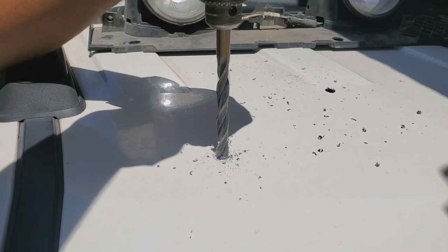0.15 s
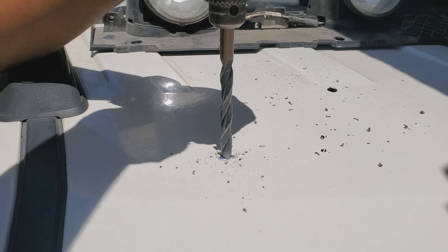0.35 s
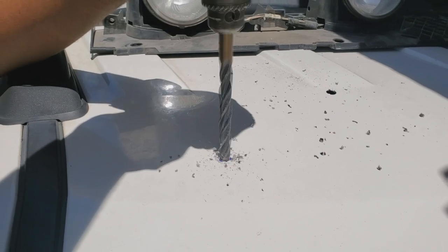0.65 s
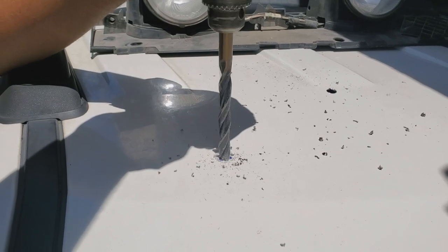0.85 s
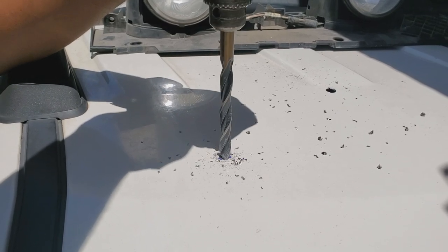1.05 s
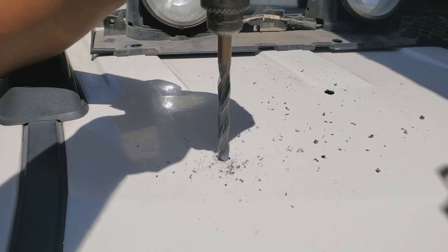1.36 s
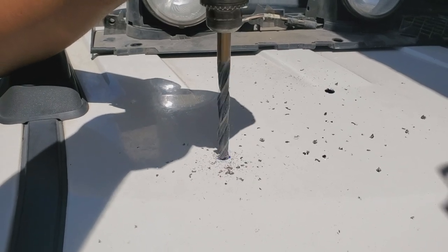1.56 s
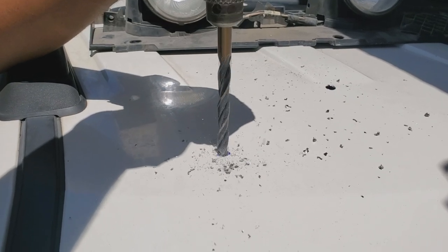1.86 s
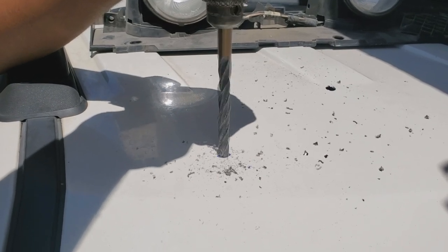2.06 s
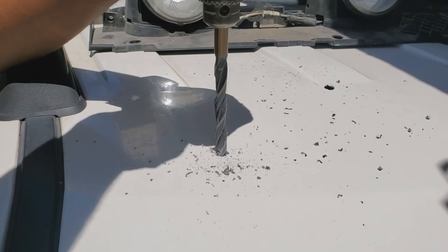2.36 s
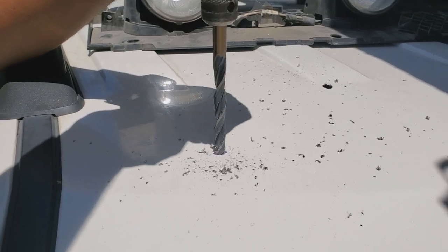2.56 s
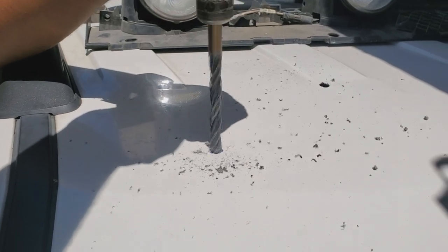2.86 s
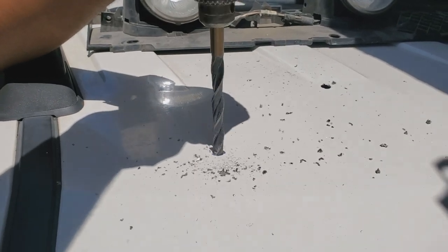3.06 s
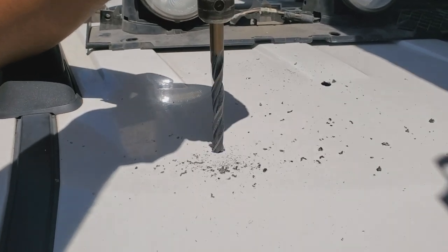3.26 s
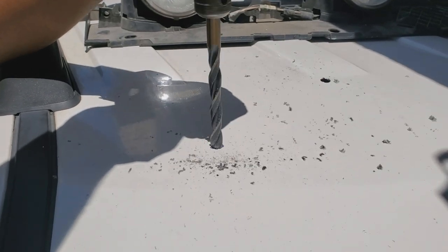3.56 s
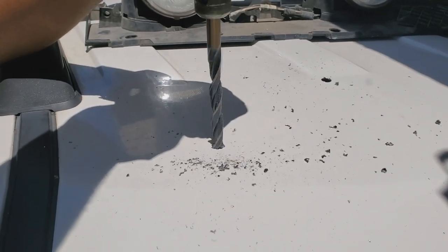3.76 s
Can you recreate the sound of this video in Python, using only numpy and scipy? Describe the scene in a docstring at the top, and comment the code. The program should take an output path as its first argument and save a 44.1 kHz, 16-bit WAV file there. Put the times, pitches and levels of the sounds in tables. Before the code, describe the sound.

A cordless drill grinds into thin sheet steel in seven short, whining, rattling bursts, outdoors.

```python
"""Seven short pulls of a cordless drill, each a rising whine that grinds, rings and sinks away in a coast-down.
Its twist bit works a sheet-steel panel close to a pair of microphones, a little nearer the left one.
One motor speed drives the tones of motor and gears, and random tiny blows that excite bit, edges and panel.
Short bursts of decaying noise fall around the pulls, a zigzag whistle fades late in the second pause,
and quiet shaped noise gives the background and a low rumble at the microphone ports."""
import sys
import numpy as np
from scipy import signal
from scipy.fft import rfft, irfft, next_fast_len
from scipy.io import wavfile
from scipy.ndimage import uniform_filter1d, map_coordinates

SR = 44100
rng = np.random.default_rng(int(sys.argv[2]) if len(sys.argv) > 2 else 0)


def transcribe(u):
    """Save the signal u as a 16-bit wav file named by the first command-line argument.

    u: samples, shape (n,) or (channels, n), limited to [-1, 1]; the rate is SR.
    q: integer samples, one column per channel.
    """
    v = np.clip(np.atleast_2d(u).T, -1, 1)
    q = np.round(v * 32767).astype(np.int16)
    wavfile.write(sys.argv[1], SR, q)


N = 171990  # length in samples


def amp(db):
    """Decibels to an amplitude factor."""
    return 10 ** (np.asarray(db) / 20)


def unit(x):
    """Scale to an rms of 1."""
    return x / np.sqrt(np.mean(x ** 2) + 1e-20)


def along(points, hz):
    """Read a curve of (freq_hz, value) points, straight between points on a log frequency axis."""
    f, v = np.transpose(points)
    return np.interp(np.log(hz + 1), np.log(f + 1), v)


def wobble(rate):
    """A smooth random curve with rate knots a second."""
    knots = rng.standard_normal(N // 8)
    return map_coordinates(knots, [np.arange(N) * rate / SR + 2], mode="wrap")


def filtered(x, response):
    """Pass x through a complex response of frequency, with spare length so that tails do not wrap."""
    m = next_fast_len(N + SR // 2)
    return irfft(rfft(x, m) * response(np.fft.rfftfreq(m, 1 / SR)), m)[..., :N]


def colour(points):
    """The response of a smooth spectrum given as (freq_hz, level_db) points."""
    return lambda f: amp(along(points, f))


def resonances(modes):
    """The response of damped modes (freq_hz, width_hz, level_db), alternating in sign."""
    def response(f):
        total = 0
        for k, (centre, width, db) in enumerate(modes):
            mode = 1j * f * width / (centre ** 2 - f ** 2 + 1j * f * width)
            total = total + (-1) ** k * amp(db) * mode
        return total
    return response


# Likeness of the two microphones' signals: freq_hz, likeness (1 is identical, 0 is unrelated)
LIKENESS = [(30, .05), (65, 1), (130, 0.94), (300, 1), (600, 0.8), (1200, 0.31), (2200, 0.73), (3300, 0.83),
            (5000, 0.23), (15000, 0.23)]


def sounded(drive, response):
    """Two unrelated drives through a body of unit power gain, blended as mid and side into left and right."""
    norm = np.sqrt(np.mean(np.abs(response(np.arange(SR // 2))) ** 2))

    def mid_and_side(f):
        turn = np.arccos(np.clip(along(LIKENESS, f), -1, 1)) / 2
        return response(f) / norm * np.array([np.cos(turn), np.sin(turn)])

    mid, side = filtered(drive, mid_and_side)
    return np.array([mid + side, mid - side])


def impacts(rate, scatter_db, rub):
    """Random tiny blows at a changing rate a second, over a share of smooth rubbing noise; rms 1."""
    hit = rng.random(N) < rate / SR
    size = hit * amp(scatter_db * np.clip(rng.standard_normal(N), -2, 2))
    blows = unit(size * rng.choice([-1, 1], (2, N)))
    return unit(blows + rub * rng.standard_normal((2, N)))


def tone(hz, rough, smear_hz):
    """A line at the two microphones, a share (rough) of its power smeared into narrow noise."""
    carrier = np.exp(2j * np.pi * np.cumsum(hz) / SR)

    def smear():
        return wobble(smear_hz) + 1j * wobble(smear_hz)

    common = smear()
    sides = []
    for _ in range(2):
        drift = 0.76 * common + 0.78 * smear()  # partly shared, partly each microphone's own
        sides.append((carrier * (np.sqrt(2 * (1 - rough)) + np.sqrt(rough) * drift)).real)
    return np.array(sides)


# Spectrum of the quiet surroundings: freq_hz, level_db (relative)
BACKGROUND = [(20, -12), (55, 2), (250, -9), (700, -16), (1400, -34), (3000, -25), (6500, -35),
              (16000, -45)]


def background():
    """The quiet of the place: steady noise, strongest in the bass."""
    return amp(-42.5) * sounded(rng.standard_normal((2, N)), colour(BACKGROUND))


def buffet():
    """Stirred air rumbles faintly on the microphone ports, unrelated left and right."""
    low_rumble = [(10, -12), (30, -6), (52, 3), (75, -8), (200, -47), (1000, -100)]  # freq_hz, level_db
    rumble = filtered(rng.standard_normal((2, N)), colour(low_rumble))
    gusts = unit(rumble * amp(4 * wobble(3.5)))
    return amp(-47.5) * gusts * amp(np.array([[2], [-2]]))  # stronger on the left


# Short bursts of noise: start_s, level_db (relative, at onset)
BURSTS = [(0.0334, -30), (0.486, -26.5), (0.5727, -24.5), (0.6156, -27), (1.0354, -23.5), (1.7385, -19.5),
          (2.2538, -23.5), (2.2852, -24)]
# Spectrum of one burst: freq_hz, level_db (relative)
BURST_COLOUR = [(100, -26), (1500, -23), (3400, 15.5), (6000, 0), (16000, -4.5)]
BURST_T60_S = 0.015


def noise_bursts():
    """Short bursts of noise that start at once and decay exponentially."""
    t = np.arange(N) / SR
    level = 0
    for start, db in BURSTS:
        level = level + (t >= start) * amp(db - 60 * np.maximum(t - start, 0) / BURST_T60_S)
    return amp(-9) * sounded(level * rng.standard_normal((2, N)), colour(BURST_COLOUR))


# Trigger pulls: start_s, release_s, top_speed_hz (motor turns a second before rounding),
# stall_hz (motor speed at which the coasting bit stops cutting), then relative levels:
# chatter_db, scrape_db, hiss_db, panel_db, thump_db, gear_db, squeal_db, motor_db
TRIGGER_PULLS = [(.036, 0.179, 394, 91.5, 0, -2.5, 1, -3.5, -15, 0.5, 3.5, -0.5),
                 (0.635, 0.773, 376, 117, -0.5, 0, 2, -0.5, -1, 3, 5, -1.5),
                 (1.185, 1.357, 395, 70, -2, 1.5, 2.5, 1.5, 1.5, -1, -11, -3),
                 (1.749, 1.909, 414.2, 65.14, -2.5, 3, 3.5, 0.5, 2.5, -1, -12, -8),
                 (2.286, 2.455, 410.3, 49.5, -5, 0.5, 2, 0.5, 2.5, -1.5, -6, -4.5),
                 (2.794, 3.01, 459.8, 59.8, -7.5, 0, 1.5, 1, -6, -0.5, -12, -7),
                 (3.375, 3.674, 492.2, 60, -11.5, -0.5, -0.5, -1, -7, -3, -13, -9)]
SPIN_UP_S, INERTIA_S = 0.125, 0.012  # time constant of the rise, rounding of the turns
KICK_HZ, COAST_HZ_PER_S = 54.94, 1112  # jump as the trigger closes, slowing after release


def motor_speed():
    """Turns a second: a kick and a levelling rise while the trigger is held, a steady slowing after it."""
    t, speed = np.arange(N) / SR, np.zeros(N)
    for pull, release, top, *_ in TRIGGER_PULLS:
        start = speed[int(pull * SR)] + KICK_HZ
        rise = np.expm1(-np.maximum(t - pull, 0) / SPIN_UP_S) / np.expm1(-(release - pull) / SPIN_UP_S)
        driven = start + (top - start) * rise
        coasting = top - COAST_HZ_PER_S * (t - release)
        run = np.where(t < release, driven, coasting)
        speed = np.where(t < pull, speed, np.maximum(run, 0))
    return np.abs(uniform_filter1d(speed, int(INERTIA_S * SR))) + 0.00077  # never quite zero


def per_pull():
    """The stall speed and the level factors of each pull, held until the next with softened steps."""
    rows = np.array(TRIGGER_PULLS)
    which = np.maximum(np.searchsorted(rows[:, 0], np.arange(N) / SR) - 1, 0)
    stall, *levels = uniform_filter1d(rows[which, 3:].T, size=400, axis=1)
    return stall, amp(levels)


def effort(speed, power):
    """Strength grows as a power of motor speed, and is 1 at the working speed of 385.3 Hz."""
    return (speed / 385.3) ** power


# Whine of the motor: multiple of motor speed, level_db (relative)
MOTOR_ORDERS = [(3, -31), (6, -28), (9, -39)]
# How the drill's housing radiates its whine: freq_hz, gain_db
HOUSING_GAIN = [(300, 10), (1000, -2.5), (1600, -0.5), (2250, 5), (2700, 2), (3150, 13), (3500, -10),
                (3900, 17), (6500, -16), (7900, 1.5), (10000, 2.5)]
# How readily the bit squeals: freq_hz, gain_db
SQUEAL_GAIN = [(2500, -17), (2950, -7), (3500, 5), (3900, -10)]
TEETH_PER_TURN = 20.45  # gear mesh, as a multiple of motor speed


def whine(speed, motor_gain, gear_gain, squeal_gain):
    """Motor orders and gear mesh; the ninth order squeals as it crosses the ring of the bit."""
    def line(order, rough, smear_hz):
        return amp(along(HOUSING_GAIN, order * speed)) * tone(order * speed, rough, smear_hz)

    motor = motor_gain * sum(amp(db) * line(round(k), rough=0.49, smear_hz=210.7) for k, db in MOTOR_ORDERS)
    mesh = amp(-32) * gear_gain * line(TEETH_PER_TURN, rough=0.62, smear_hz=486)
    ninth = 9 * speed
    readiness = amp(along(SQUEAL_GAIN, ninth))
    squeal = amp(-17) * squeal_gain * readiness * tone(ninth, rough=0.32, smear_hz=275)
    return effort(speed, power=2.22) * (motor + mesh + squeal)


# Rustle of brushes and loose gears: freq_hz, level_db (relative)
BRUSH_COLOUR = [(200, -9), (1200, -7), (2800, 2), (4500, -2), (6500, -22), (16000, -21)]


def free_run(speed):
    """Brushes and loose gears rustle and tick whenever the motor turns, whether or not the bit cuts."""
    rustle = sounded(impacts(150 + 5 * speed, scatter_db=4, rub=0.4), colour(BRUSH_COLOUR))
    return amp(-33.5) * effort(speed, power=0.34) * rustle


BITE_HZ = 47.3  # motor speed at which the bit starts to cut


def grip(speed, stall):
    """Share of cutting, 0 to 1: a low threshold as the speed rises, the pull's stall speed as it falls."""
    limit = np.where(np.gradient(speed) > 0, BITE_HZ, stall)
    return speed ** 4 / (speed ** 4 + limit ** 4)


# Ring of bit and chuck: freq_hz, width_hz, level_db (relative)
CHUCK_MODES = [(3129, 183, 4.5), (3404, 313, 8.5), (3532, 212, 9.5)]
# Scrape of the cutting edges: freq_hz, level_db (relative)
SCRAPE_COLOUR = [(40, -39), (150, 2), (450, -14.5), (650, 0), (1000, 2), (1450, -6), (2200, 0), (2650, 0),
                 (3300, 6), (4300, 0.5), (5100, 1.5), (6000, -15), (8000, -27.5), (16000, -26)]
# Fine hiss of the cut: freq_hz, level_db (relative)
HISS_COLOUR = [(100, -60), (3000, -15), (6000, 6), (7600, 4.5), (9300, -3), (10800, 7), (12000, 4),
               (13500, 5.5), (16000, -5.5)]


def cutting(speed, chatter_gain, scrape_gain, hiss_gain):
    """The edges catch and tear off chips: ringing chatter, a broad scrape and a fine hiss."""
    bite = amp(0.71 * wobble(75) + 0.94 * wobble(420))  # uneven catching shared by all three
    catches = impacts(500 + 2 * speed, scatter_db=1.5, rub=0.64)
    chatter_drive = bite * chatter_gain * effort(speed, power=0.91) * catches
    tears = impacts(1200 + 9 * speed, scatter_db=2, rub=0.65)
    scrape_drive = bite * scrape_gain * effort(speed, power=1.075) * tears
    grains = amp(0.58 * wobble(980)) * impacts(3500 + 18 * speed, scatter_db=4, rub=1.5)
    hiss_drive = bite * hiss_gain * effort(speed, power=1.62) * grains
    chatter = amp(-15.5) * sounded(chatter_drive, resonances(CHUCK_MODES))
    scrape = amp(-18.5) * sounded(scrape_drive, colour(SCRAPE_COLOUR))
    hiss = amp(-28) * sounded(hiss_drive, colour(HISS_COLOUR))
    return chatter + scrape + hiss


# Drone of the bit: multiple of the judder rate, level_db (relative)
JUDDER_ORDERS = [(2, -32), (3, -29), (4, -24.5), (5, -34), (7, -29.5)]


def judder(speed):
    """The bit judders evenly once in about eight motor turns and the panel drones, steeply louder with speed."""
    rate = speed / 8.04  # gear ratio
    drone = sum(amp(db) * tone(round(k) * rate, rough=0.1, smear_hz=20) for k, db in JUDDER_ORDERS)
    return amp(-6) * effort(speed, power=3) * drone


# Ringing modes of the steel sheet: freq_hz, width_hz, level_db (relative)
SHEET_MODES = [(122, 11, -6.5), (186.8, 11, -2), (209.5, 13.4, -2), (238.4, 9.1, 2.5), (278.3, 4.25, 4.5),
               (325.6, 12, -6.5), (390, 23.5, -3), (418.6, 21, 3), (447, 62.6, -3.5), (540, 35, -6),
               (602, 13.3, -10), (692.4, 20.5, -11.5), (762.5, 23, -12), (904, 20, -12)]
# The whole panel flexing: freq_hz, width_hz, level_db (relative)
FLEX_MODES = [(58, 30, -11), (86, 8.4, 4.5), (121.6, 5.1, -4)]


def panel(speed, panel_gain, thump_gain):
    """The bit hops in its dimple, ringing the sheet and flexing it."""
    hops = impacts(350 + speed, scatter_db=2, rub=0.59)
    ring = sounded(panel_gain * effort(speed, power=0.55) * hops, resonances(SHEET_MODES))
    shoves = impacts(90 + 0.27 * speed, scatter_db=6, rub=0.2)
    thump = sounded(thump_gain * effort(speed, power=1.2) * shoves, resonances(FLEX_MODES))
    return amp(-22) * ring + amp(-26) * thump


CHIRP_START_S, CHIRP_PERIOD_S, CHIRP_FADE_DB_PER_S = 1.113, 0.034, 175
CHIRP_LOW_HZ, CHIRP_HIGH_HZ = 500, 11300


def chirp():
    """A thin whistle zigzags down and up in pitch and fades late in the second pause."""
    t = np.arange(N) / SR - CHIRP_START_S
    swing = np.abs(2 * (t / CHIRP_PERIOD_S % 1) - 1)
    hz = CHIRP_LOW_HZ + (CHIRP_HIGH_HZ - CHIRP_LOW_HZ) * swing ** 2
    pitch_db = along([(500, -19), (3000, -1), (5500, 15), (10500, -13)], hz)  # loudest near 5500 Hz
    level = (t > 0) * amp(-38 - CHIRP_FADE_DB_PER_S * np.abs(t) + pitch_db)
    return level * tone(hz, rough=0.055, smear_hz=205)


# Decay of the surroundings: freq_hz, t60_s
ROOM_DECAY = [(100, 0.22), (1000, 0.71), (3500, 0.21), (12000, 0.05)]


def room(x):
    """The surroundings answer with decaying noise, longest near 1 kHz and short in the treble."""
    hz, t, z = signal.stft(rng.standard_normal((2, SR // 2)), SR, nperseg=256)
    decay = amp(-60 * t / along(ROOM_DECAY, hz)[:, None])
    tail = signal.istft(z * decay, SR, nperseg=256)[1]
    return signal.fftconvolve(x, tail / np.linalg.norm(tail[0]), axes=1)[:, :N]


LEFT_LEAD_S = 0.0001  # how much earlier the drill reaches the left microphone


def scene():
    """The drill on its panel, a little nearer the left microphone, over a quiet background."""
    speed = motor_speed()
    stall, (chatter, scrape, hiss, ring, thump, gear, squeal, motor) = per_pull()
    cut = grip(speed, stall)
    drill = whine(speed, motor, gear, squeal) + free_run(speed)
    steel = cutting(speed, cut * chatter, cut * scrape, cut * hiss)
    steel = steel + judder(speed) + panel(speed, np.sqrt(cut) * ring, cut * thump)
    half_lead = LEFT_LEAD_S / 2 * np.array([[1], [-1]])  # left early, right late
    close = drill + steel + noise_bursts() + chirp()
    near = filtered(close, lambda f: np.exp(2j * np.pi * f * half_lead))
    return near + amp(-18) * room(near) + background() + buffet()


# Difference in colour of the two microphones: freq_hz, left_minus_right_db
MIC_BALANCE = [(30, 2), (62, -5), (95, 5.5), (160, 0), (270, -0.5), (450, 3), (740, -0.5), (1220, 1),
               (2010, -2), (3330, 1.5), (5500, -1), (9080, -2), (12000, 4.5), (15000, -16)]
CEILING, TOP_HZ = 0.95, 15850  # level the peaks bend towards (full scale 1), band limit


def record(dry):
    """The microphones differ in colour; the highest peaks are rounded, then all above the band limit is cut."""
    x = filtered(dry, lambda f: amp(along(MIC_BALANCE, f) * np.array([[0.5], [-0.5]])))
    x = x / (1 + np.abs(x / CEILING) ** 6) ** (1 / 6)
    return filtered(x, lambda f: f < TOP_HZ)


dry = scene()
out = record(dry)
transcribe(out)
```